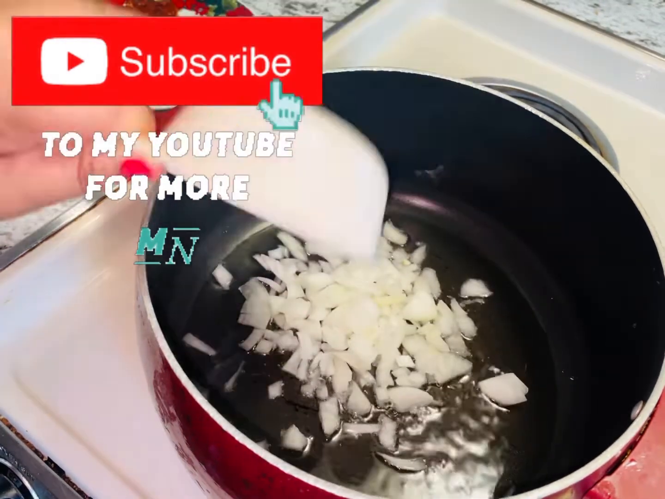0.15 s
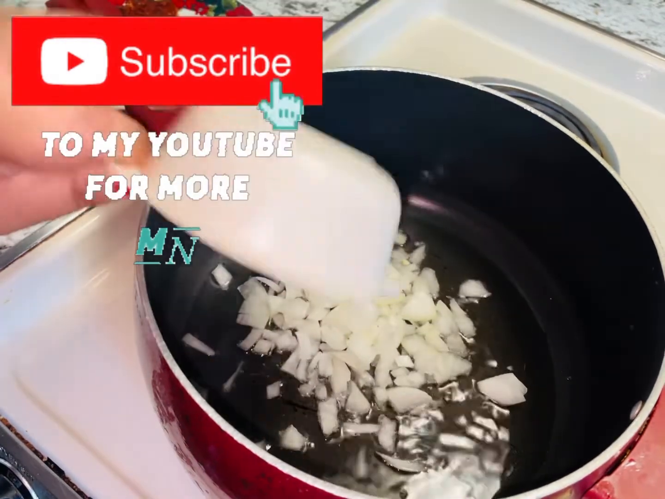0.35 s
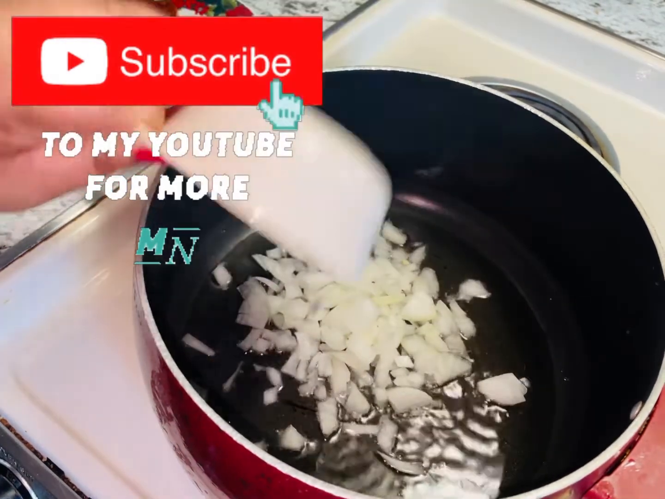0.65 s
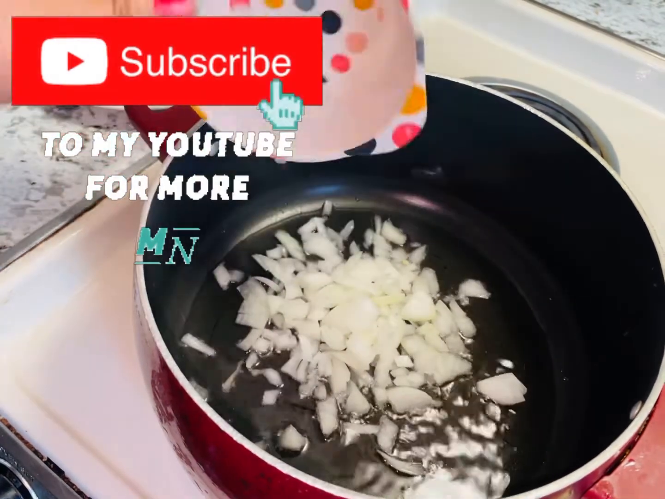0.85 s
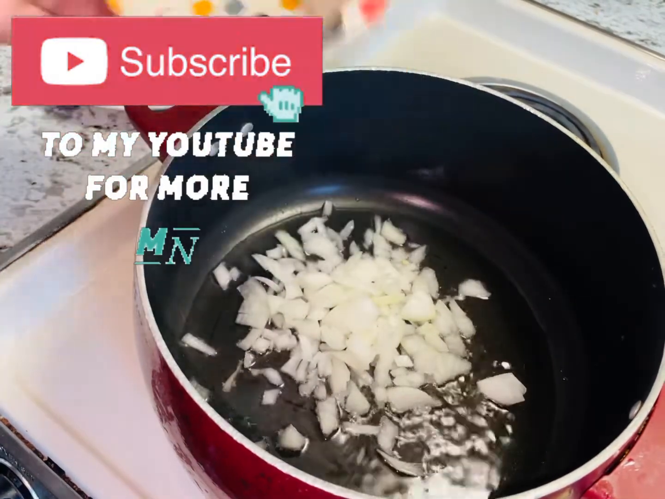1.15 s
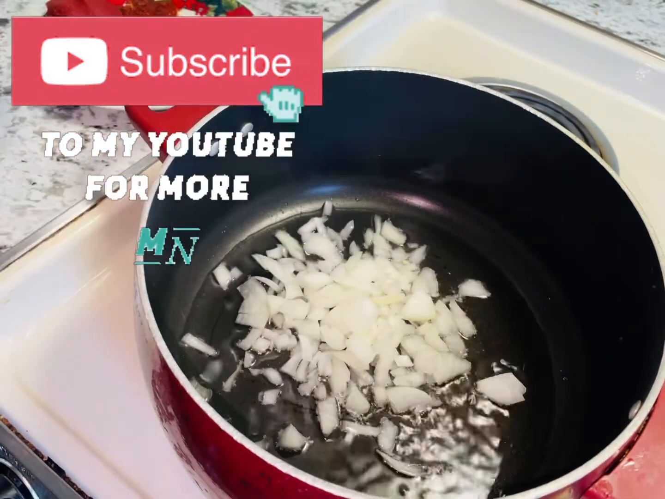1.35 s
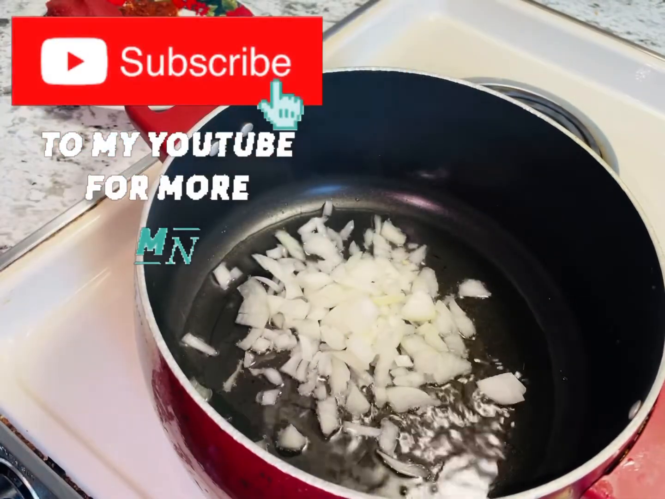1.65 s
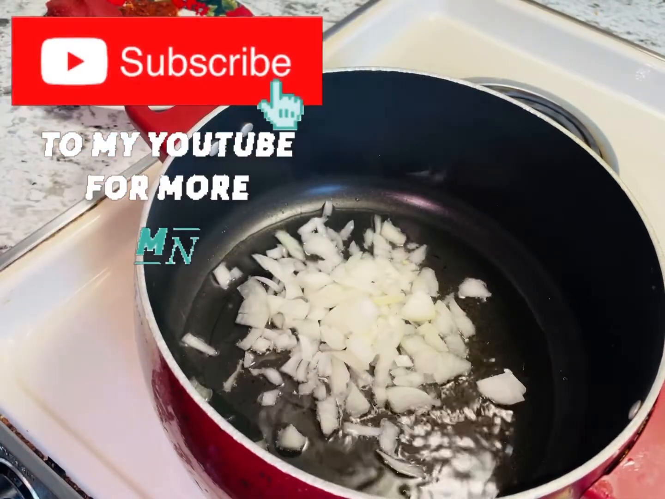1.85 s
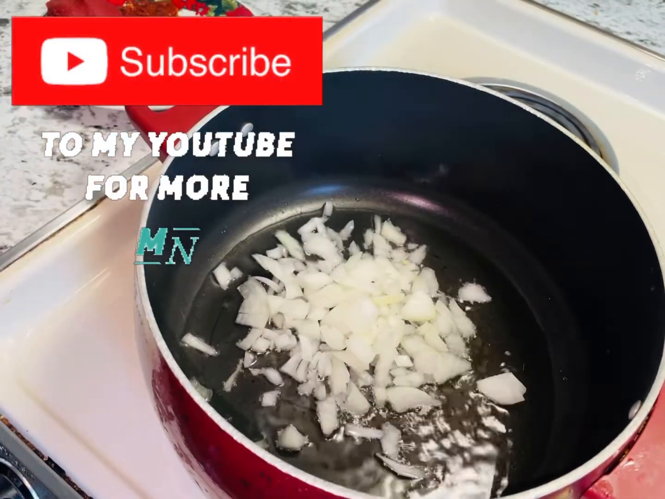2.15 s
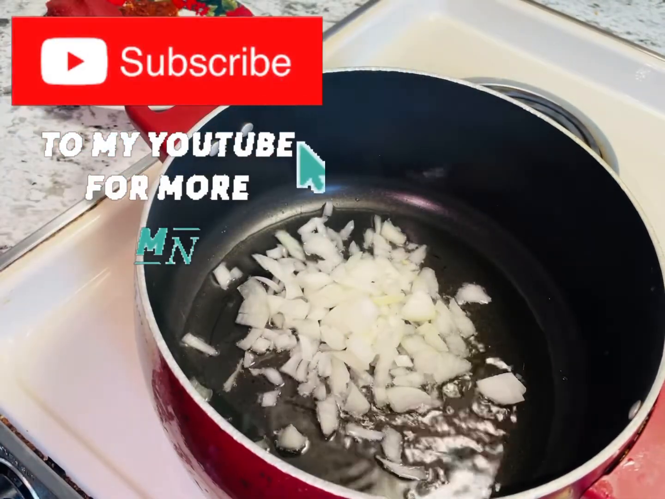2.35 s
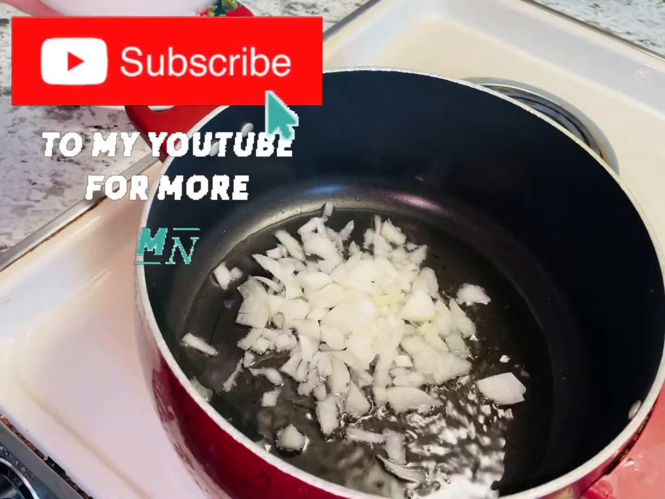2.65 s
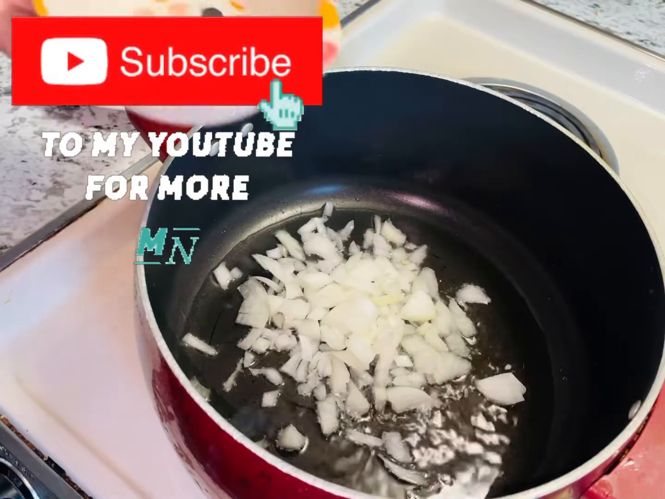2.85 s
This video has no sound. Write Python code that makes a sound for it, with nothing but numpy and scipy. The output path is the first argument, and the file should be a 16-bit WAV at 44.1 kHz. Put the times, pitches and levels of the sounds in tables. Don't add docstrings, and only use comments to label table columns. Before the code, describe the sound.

Chopped onion sizzles continuously in hot oil, a fine bright hiss full of tiny pops, slightly stronger at first. An emptied bowl knocks the counter around 0.16, 0.43 and 0.63 seconds, scraping between until about 0.9. Loud spits snap near 0.9 and 1.16. A wooden spoon clicks twice with a short drag around 1.85. Sizzling and scattered pops continue to 3 seconds over faint fridge hum in a small kitchen.

```python
import sys
import numpy as np
from scipy import signal
from scipy.fft import rfft, irfft
from scipy.io import wavfile
from scipy.ndimage import uniform_filter1d

SR = 44100
rng = np.random.default_rng(int(sys.argv[2]) if len(sys.argv) > 2 else 0)


def voltage_ratio(level):
    return 10 ** (np.asarray(level, float) / 20)


def output_pcm(signal):
    pcm = np.clip(np.atleast_2d(signal).T, -1, 1) * 32767
    wavfile.write(sys.argv[1], SR, np.round(pcm).astype(np.int16))


N = 132300

# pitch_hz, level_db (rms)
MAINS_TONES = [(59.5, -58), (119.9, -56.5), (240, -68), (479.1, -63)]
# pitch_hz, width_hz, level_db
MOTOR_HUM = [(63, 18, -66), (102.6, 48, -57.5), (120.7, 8, -57.5), (150.7, 52, -63), (190.6, 14, -62.5),
             (239.4, 42, -60), (302.6, 59, -58.5)]
# pitch_hz, level_db (per Hz)
ROOM_SPECTRUM = [(15, -40), (25, -15), (117, 5), (390, -13.5), (486, -14), (662, -16), (936, -20.5),
                 (1700, -9), (2500, -10), (3250, -64), (5500, -120)]

# start_s, strength_db, ring_s, tip_share (0-1, 1 = struck at the tip)
SPOON_TAPS = [
    (1.8311, -29.5, 0.0041, 0.4),
    (1.8395, -21, 0.0036, 0.97),
    (1.8831, -20, 0.0043, 0),
    (1.898, -39, 0.003, 0.5),
    (1.911, -36, 0.005, 0.2),
    (1.924, -43, .006, 0.5),
    (1.845, -29.5, 0.0027, 0.5),
    (1.8908, -25, 0.0022, 0),
    (2.037, -42.5, 0.0038, 0.3),
]
# time_s, rub_level_db
SPOON_DRAG = [
    (1.82, -64),
    (1.835, -39),
    (1.87, -34.5),
    (1.9, -36),
    (1.95, -38),
    (2.0, -57.5),
]
# pitch_hz, width_hz, level_db
SPOON_MODES = [(343, 270, -21), (786, 400, -16.5), (1818, 84, 0), (1270, 600, -19), (2140, 124, -5),
               (2650, 210, -7.5), (3100, 420, -15), (3790, 180, -5), (4650, 380, -11.5), (5400, 400, -9.5)]
TIP_TILT = [5, 2, -7, 1, 4.5, 4.5, 8, -12, 7.5, -11]
DRAG_TILT = [11, 9.5, -5.5, 4.5, -4, -3, 8.5, 0, -2, 3.5]

# start_s, strength_db, crack_db, shudder_s, counter_spot_pitch_hz
BOWL_KNOCKS = [(0.1617, -21.5, 3.5, 0.012, 1322), (0.4332, -29.5, 1, 0.014, 455),
               (0.4345, -25.5, -6, 0.0056, 1480), (.4443, -32.5, 2, 0.0079, 1360),
               (0.6342, -28, 8.5, 0.013, 1470), (2.851, -43, -23, 0.012, 950),
               (.1635, -18.5, -11, 0.0042, 320), (.168, -20, -9, 0.01, 915), (.6365, -25.5, -3, 0.009, 440),
               (.195, -30.5, -2, 0.014, 520), (.177, -25.5, -16, 0.012, 440),
               (.4375, -29.5, -12, 0.0062, 760), (0.48, -35, -8, .01, 1050),
               (0.73, -29.5, -10, 0.0071, 990), (.637, -33, -20, 0.011, 280)]
# time_s, rub_level_db
BOWL_SLIDE = [(.17, -53), (.19, -34.5), (.245, -36), (.3, -47), (.435, -52), (.455, -38), (.485, -38.5),
              (.512, -30), (.54, -35), (.59, -36.5), (.62, -54), (.645, -32.5), (.72, -33), (.77, -36),
              (.8, -41), (.88, -50.5)]
# pitch_hz, width_hz, level_db
STRUCK_MODES = [(230, 140, -8), (320, 110, -8.5), (432, 78, -2), (569, 88, -2), (730, 99, -8.5),
                (936, 75, -4), (1332, 43, -7.5), (1630, 170, -6.5), (1900, 87, -12), (2830, 300, -4),
                (3750, 300, -8), (4840, 230, -3), (6800, 520, -9)]
# pitch_hz, width_hz, level_db
RUBBED_MODES = [(162, 16, -10), (404, 52, -1.5), (496, 72, -4), (555, 65, -2.5), (839, 110, -6.5),
                (949, 72, -2.5), (1450, 124, -5.5), (1946, 120, -8), (2540, 410, -8.5), (2835, 180, -6),
                (3500, 210, -13.5), (4090, 450, -3), (4785, 67, -9), (5700, 720, -18.5)]

# start_s, peak_db, pitch_hz
SMALL_POPS = [(.0022, -34, 6500), (.016, -33.5, 3000), (.038, -29.5, 5900), (.0631, -24, 5900),
              (.1034, -27.5, 5200), (0.1263, -33, 5500), (.2496, -27, 5900), (.2917, -28, 12000),
              (0.3496, -32, 5520), (.362, -27, 9500), (0.4756, -20.5, 13400), (.5946, -41, 11850),
              (.6948, -33, 12000), (.797, -31, 13000), (1.0326, -28, 13000), (1.185, -28, 7000),
              (1.207, -27.5, 7600), (1.2677, -32, 12000), (1.299, -28, 9000), (1.3177, -30, 7900),
              (1.565, -38, 14000), (1.6766, -36, 3100), (1.7176, -35.5, 8300), (1.7927, -33, 12000),
              (1.925, -32, 12000), (1.9635, -31, 11500), (1.999, -30, 10300), (2.0648, -36, 5500),
              (2.095, -30, 9000), (2.179, -31, 5500), (2.1881, -27.5, 10000), (2.197, -33, 8000),
              (2.231, -33, 4500), (2.2774, -33, 9300), (2.299, -32, 7900), (2.4022, -37, 5900),
              (2.4352, -33, 11000), (2.445, -34, 13000), (2.4634, -36, 9300), (2.4907, -34, 8600),
              (2.525, -34, 12000), (2.58, -32, 10500), (2.603, -32, 4770), (2.7095, -29.5, 6000),
              (2.7403, -34, 6500), (2.7603, -37.5, 11000), (2.7864, -34, 12000), (2.7984, -34, 11000),
              (2.89, -33, 9150), (2.9627, -33, 11000), (2.9892, -41, 6200)]
# start_s, peak_db, pitch_hz, length_cycles
LARGE_SPITS = [(0.1428, -23, 8550, 6.8), (0.3966, -26, 7700, 1.2), (0.7703, -25, 6700, 2.1),
               (0.8756, -25.5, 7060, 0.95), (0.9024, -19, 6600, 0.62), (0.941, -20.5, 4000, 1.5),
               (1.135, -25.5, 8400, 3.4), (1.135, -22, 3500, 2.8), (1.1582, -14, 5700, 1.34),
               (1.2677, -25, 8000, 1.5), (1.297, -22.5, 3030, 8.5), (1.3966, -27.5, 5400, 12),
               (1.406, -32, 8000, 8), (1.464, -32, 1850, 5), (1.585, -21, 5100, 2.8),
               (1.962, -27, 5430, 0.92), (1.9957, -26, 5450, 0.76), (2.037, -32.5, 2960, 9.3),
               (2.084, -22.5, 6800, 1.7), (2.141, -33, 2990, 17), (2.2212, -24.5, 8400, 2.2),
               (2.2753, -27, 3950, 2.2), (2.297, -24, 1540, 0.81), (2.4812, -26.5, 5130, 1.5),
               (2.5955, -25, 6000, 1.9), (2.749, -28.5, 4900, 2.1), (2.786, -33.5, 6600, 5.5)]
# delay_s, level_db
POT_ECHOES = [(.00062, -10.5), (.0014, -15.5), (.0024, -12), (.0031, -13.5), (.0055, -21)]
# time_s, level_db
FRY_LEVEL = [
    (0.0, -38),
    (0.47, -41),
    (0.6, -39),
    (1.64, -41),
    (2.06, -41),
    (2.41, -42),
    (3.0, -42),
]
# pitch_hz, level_db (per Hz)
FIZZ_SPECTRUM = [(240, -25), (950, -19.5), (1580, -24.5), (2800, -9.4), (3020, -6), (6740, 2), (12800, -4),
                 (16000, -4)]
# pitch_hz, width_hz, level_db
POT_AIR = [(1030, 400, -10.5), (1900, 69, 0), (2423, 170, -3.5), (3080, 125, -3.5), (3674, 290, -7.5),
           (5830, 750, 0.5)]


def evened(x):
    return x / np.sqrt(np.mean(x ** 2) + 1e-20)


def curve(points):
    time_s, level_db = np.transpose(points)
    return voltage_ratio(np.interp(np.arange(N) / SR, time_s, level_db))


def coloured(x, points):
    points_hz, level_db = np.transpose(points)
    hz = np.fft.rfftfreq(len(x), 1 / SR)
    gain = voltage_ratio(np.interp(np.log(hz + 1), np.log(points_hz + 1), level_db))
    return irfft(rfft(x) * gain, len(x))


def resonate(x, hz, width):
    r = np.exp(-np.pi * width / SR)
    poles = [1, -2 * r * np.cos(2 * np.pi * hz / SR), r * r]
    return signal.lfilter([1, 0, -1], poles, x) * np.sqrt((1 - r * r) / 2)


def body(x, modes, tilt_db=0):
    tilt_db = tilt_db * np.ones(len(modes))
    total = 0
    for k, (hz, width, db) in enumerate(modes):
        total = total + (-1) ** k * voltage_ratio(db + tilt_db[k]) * resonate(x, hz, width)
    return total / 2


def add(mix, start_s, sound):
    part = mix[round(start_s * SR):][:len(sound)]
    part += sound[:len(part)]


def kitchen():
    t = np.arange(N) / SR
    tones = sum(voltage_ratio(db) * np.sqrt(2) * np.sin(2 * np.pi * hz * t) for hz, db in MAINS_TONES)
    hum = np.zeros(N)
    for hz, width, db in MOTOR_HUM:
        band = resonate(resonate(rng.standard_normal(N), hz, width), hz, width)
        hum += voltage_ratio(db) * evened(band)
    room_tone = voltage_ratio(-56) * evened(coloured(rng.standard_normal(N), ROOM_SPECTRUM))
    return tones + hum + room_tone


def room(x):
    t60_s, rise_s = 0.22, 0.0016
    t = np.arange(SR // 2) / SR
    decay = voltage_ratio(-60 * t / t60_s) * np.minimum(t / rise_s, 1)
    tail = resonate(rng.standard_normal(len(t)), 600, 3560) * decay
    return signal.fftconvolve(x, tail / np.linalg.norm(tail))[:N]


def gritty(slips_per_s):
    slips = (rng.random(N) < slips_per_s / SR) * np.minimum(rng.exponential(1.2, N), 2.5)
    return evened(rng.standard_normal(N) * (0.6 + slips))


def spoon():
    noise_db = -5
    t = np.arange(2000) / SR
    mid, tip = np.zeros((2, N))
    noises = rng.standard_normal((len(SPOON_TAPS), 2000))
    for (start_s, db, ring_s, tip_share), noise in zip(SPOON_TAPS, noises):
        contact = 1.5 * np.exp(-t / 0.0001)
        rattle = voltage_ratio(noise_db) * noise * np.exp(-t / ring_s)
        tap = voltage_ratio(db + 8) * (contact + rattle)
        add(mid, start_s, (1 - tip_share) * tap)
        add(tip, start_s, tip_share * tap)
    drag = body(gritty(2500) * curve(SPOON_DRAG), SPOON_MODES, np.array(DRAG_TILT))
    return drag + body(mid, SPOON_MODES) + body(tip, SPOON_MODES, np.array(TIP_TILT))


def bowl_knocks():
    shudder_db, spot_db, thud_db, boom_db = -5, 0, -17, -38
    blow_rise_s, spot_rise_s, crack_s = 0.0017, 0.0013, 0.003
    thud_hz, boom_hz, crack_hz = 605, 107, 5450
    t = np.arange(3000) / SR
    blows, cracks, spots = np.zeros((3, N))
    contact = 2.6 * np.exp(-t / 0.0001)
    noises = rng.standard_normal((len(BOWL_KNOCKS), 2, 3000))
    for (start_s, db, crack_db, shudder_s, spot_hz), noise in zip(BOWL_KNOCKS, noises):
        fade = np.exp(-(t / shudder_s) ** 2)
        shudder = noise[0] * np.minimum(t / blow_rise_s, 1) * fade
        add(blows, start_s, voltage_ratio(db + shudder_db) * (0.5 * contact + shudder))
        spot = np.sin(2 * np.pi * spot_hz * t) * np.minimum(t / spot_rise_s, 1) * fade
        add(spots, start_s, voltage_ratio(db + spot_db) * spot)
        crack = contact + noise[1] * np.exp(-(t / crack_s) ** 2)
        add(cracks, start_s, voltage_ratio(db + crack_db) * crack)
    thud = voltage_ratio(thud_db) * resonate(blows, thud_hz, 720)
    boom = voltage_ratio(boom_db) * resonate(resonate(blows, boom_hz, 31.3), boom_hz, 31.3)
    return voltage_ratio(3.5) * body(blows, STRUCK_MODES) + thud + boom + spots + resonate(cracks, crack_hz, 3200)


def bowl_slide():
    grit_db, grit_hz = -7.5, 3500
    rub = gritty(2500) * curve(BOWL_SLIDE)
    grit = voltage_ratio(grit_db) * resonate(resonate(rub, grit_hz, 6400), grit_hz, 6700)
    scrape = voltage_ratio(-20) * resonate(rub, 660, 480)
    return body(rub, RUBBED_MODES) + grit + scrape


def bubble(hz, cycles):
    pitch_rise = 0.029
    turns = np.arange(600) / SR * hz
    ring = np.sin(2 * np.pi * turns * (1 + pitch_rise * turns / cycles))
    return ring * np.exp(-(turns / cycles) ** 2 * 2)


def echoed(x):
    out = x.copy()
    for delay_s, db in POT_ECHOES:
        reflection = voltage_ratio(db) * resonate(x, 5200, 4700)
        add(out, delay_s * rng.uniform(0.96, 1.0), reflection)
    return out


def ticks():
    spray_db, spray_t60_s = -7, 0.02
    out, t = np.zeros(N), np.arange(600) / SR
    noises = rng.standard_normal((len(SMALL_POPS), 600))
    for (start_s, db, hz), noise in zip(SMALL_POPS, noises):
        snap = bubble(hz, max(1, hz / 7000))
        spray = voltage_ratio(spray_db - 60 * t / spray_t60_s) * resonate(noise, hz, 0.7 * hz)
        add(out, start_s - 0.0003, voltage_ratio(db + 2) * (snap / snap.max() + spray))
    return out


def spits():
    snap_db, spray_db = -2, -14.5
    spray_t60_s, spray_rise_s = 0.036, 0.0026
    out, t = np.zeros(N), np.arange(3000) / SR
    noises = rng.standard_normal((len(LARGE_SPITS), 3000))
    for (start_s, db, hz, cycles), noise in zip(LARGE_SPITS, noises):
        snap = voltage_ratio(snap_db) / np.sqrt(cycles) * bubble(6900, 1.2)
        burst = np.pad(bubble(hz, cycles) + snap, (0, 2400))
        burst = resonate(echoed(burst), 5500, 10400)
        spray = voltage_ratio(spray_db - 60 * t / spray_t60_s) * resonate(noise, hz, hz * 2 / (1 + cycles))
        spray *= np.minimum(t / spray_rise_s, 1)
        add(out, start_s, voltage_ratio(db) * (burst + spray))
    return out


def fizz():
    bursts_per_s, spread_db, fizz_db, hiss_db = 2500, 1.5, 0.5, -2
    spots, tail_t60_s = 40, 0.029
    strength = voltage_ratio(spread_db * np.minimum(rng.exponential(1, N), 5))
    bursts = strength * (rng.random(N) < bursts_per_s / SR)
    spot_of_burst = rng.integers(0, spots, N)
    tails = rng.standard_normal((spots, 1500)) * voltage_ratio(-12 - 60 * np.arange(1500) / SR / tail_t60_s)
    tails[:, 0] = 1
    grains = np.zeros(N)
    for k, hz in enumerate(np.geomspace(1500, 15500, spots)):
        shape = np.convolve(evened(bubble(hz, 1.78)) * np.sqrt(hz), tails[k])
        grains += signal.oaconvolve(bursts * (spot_of_burst == k), shape)[:N]
    flutter = voltage_ratio(1.14 * evened(uniform_filter1d(rng.standard_normal(N), 1500)))
    hiss = voltage_ratio(hiss_db) * rng.standard_normal(N) * flutter
    drive = evened(grains) + hiss
    sizzle = evened(coloured(drive + body(drive, POT_AIR), FIZZ_SPECTRUM))
    return voltage_ratio(fizz_db) * curve(FRY_LEVEL) * sizzle


def scene():
    things = bowl_knocks() + bowl_slide() + spoon()
    reverberation = voltage_ratio(-14.5) * room(things)
    frying = fizz() + spits() + ticks()
    return (kitchen() + things + reverberation + frying)[None]


def roll_off(x):
    return signal.sosfilt(signal.butter(12, 16830, fs=SR, output="sos"), x)


def record(dry):
    edge_hz, edge_db, bass_hz = 15740, -62, 48
    hz = np.fft.rfftfreq(N, 1 / SR)
    top = np.where(hz > edge_hz, voltage_ratio(edge_db), 1)
    bass = 1 / np.sqrt(1 + (bass_hz / (hz + 1)) ** 12)
    mix = irfft(rfft(dry) * top * bass, N)
    return roll_off(mix)


dry = scene()
out = record(dry)
output_pcm(out)
```